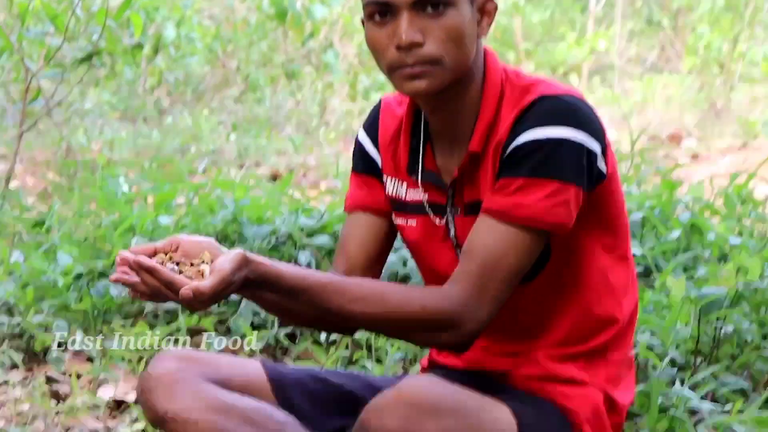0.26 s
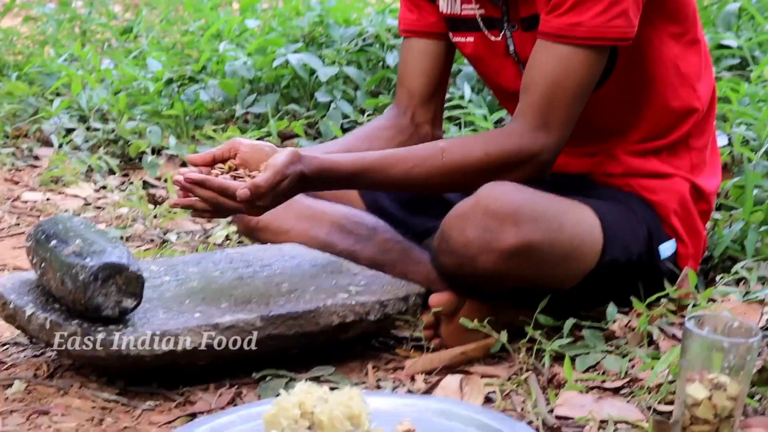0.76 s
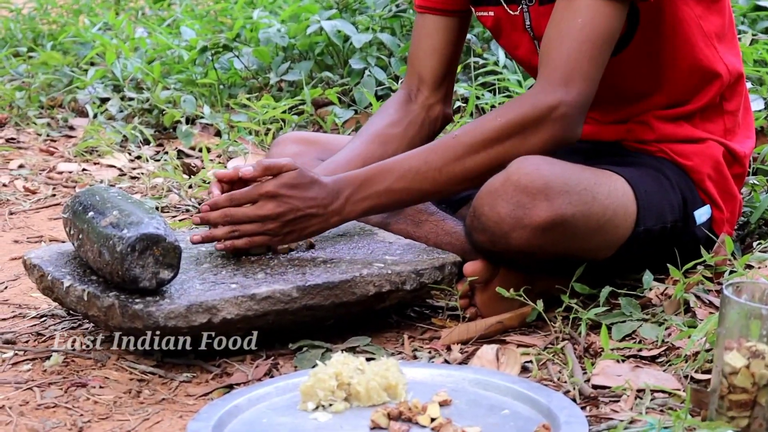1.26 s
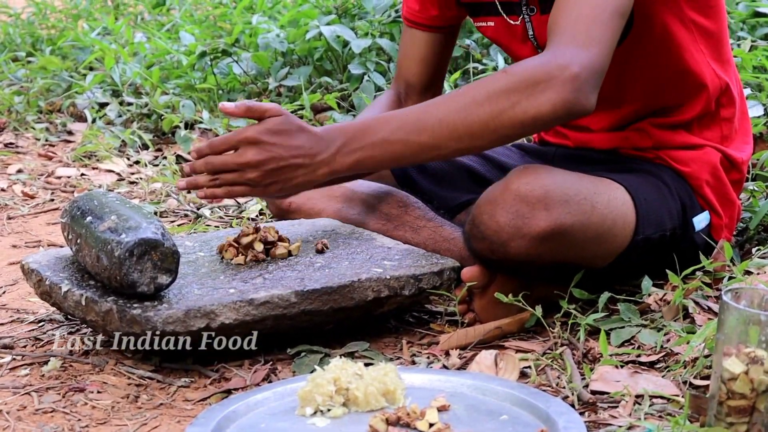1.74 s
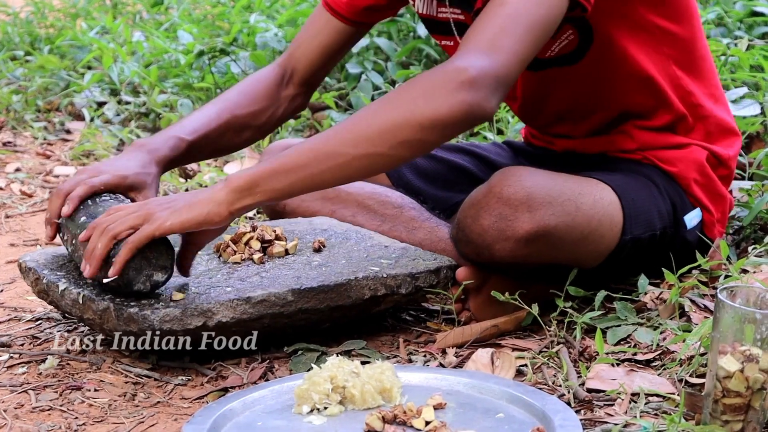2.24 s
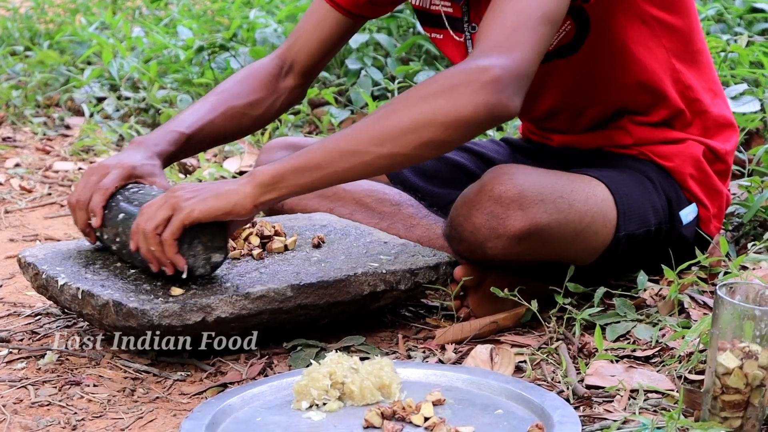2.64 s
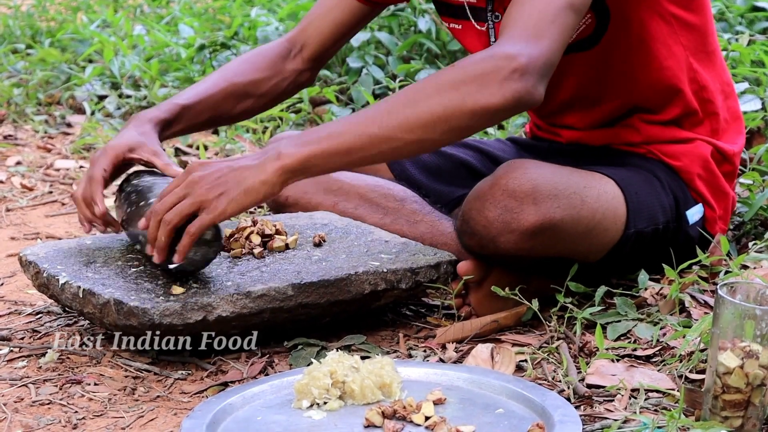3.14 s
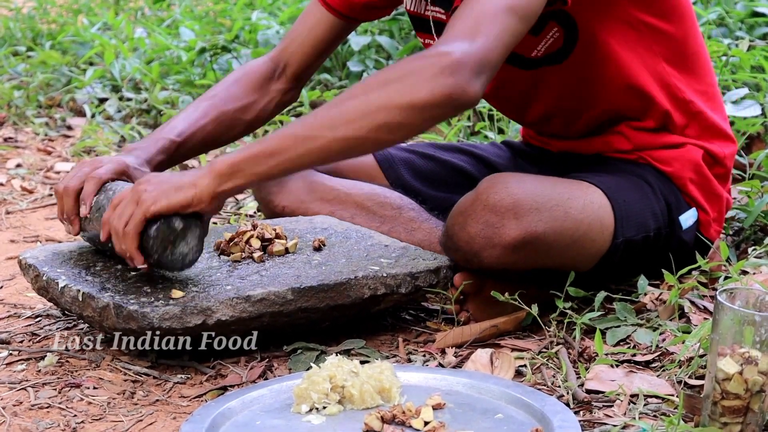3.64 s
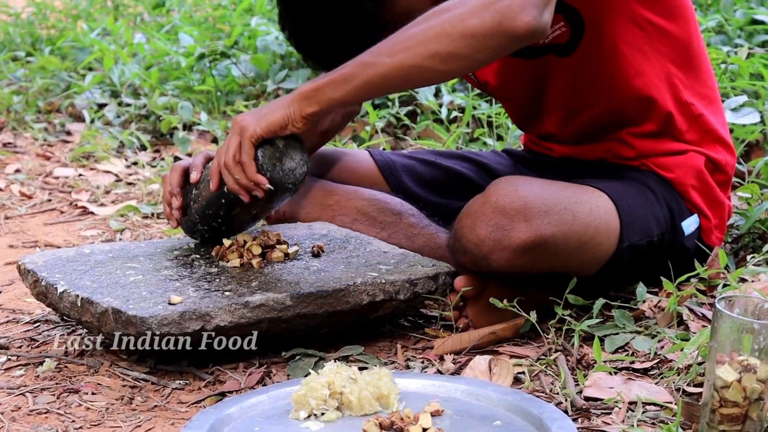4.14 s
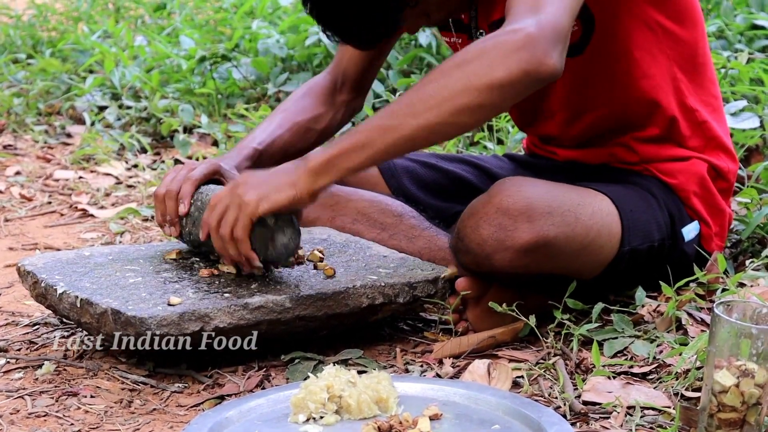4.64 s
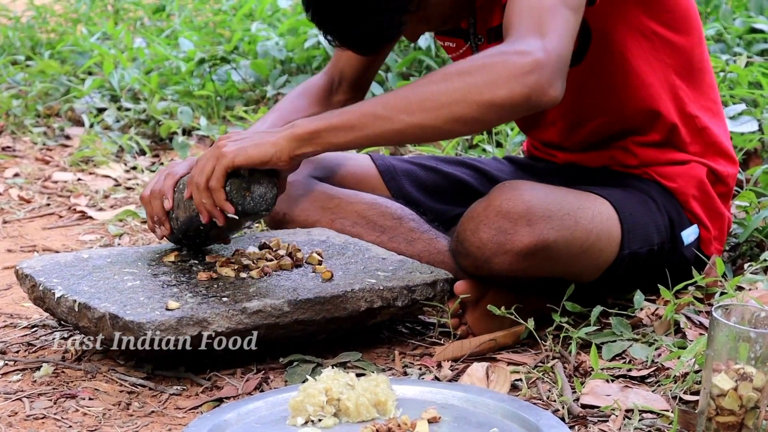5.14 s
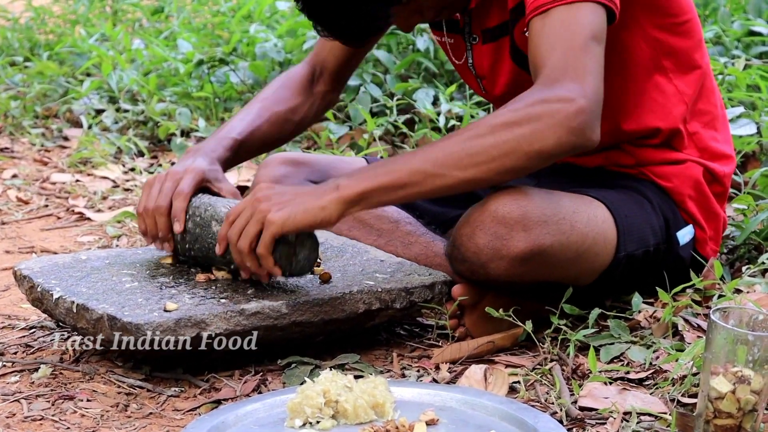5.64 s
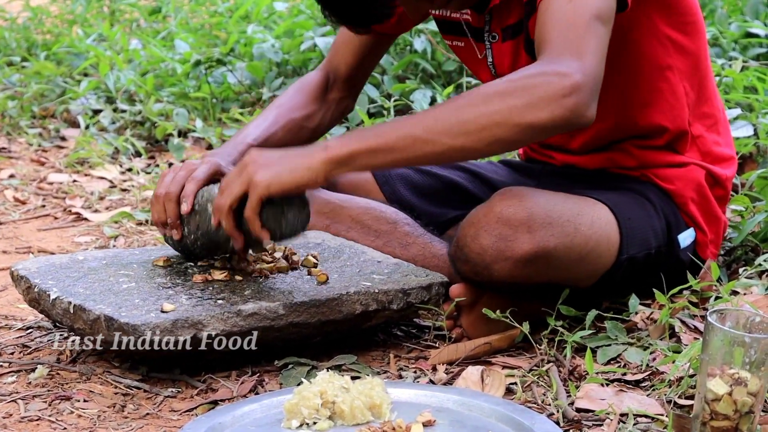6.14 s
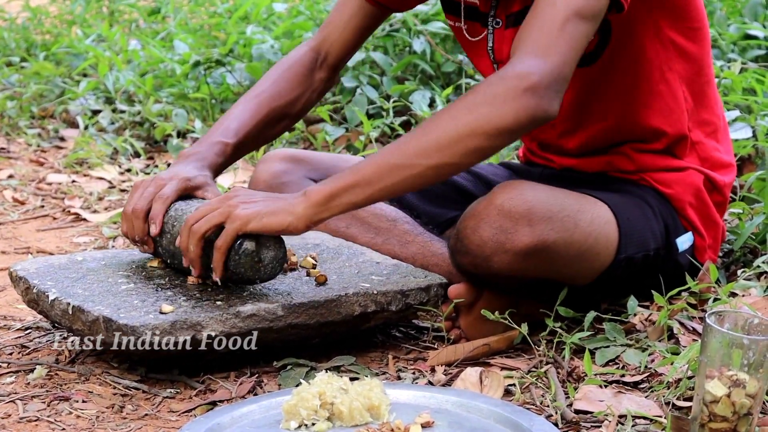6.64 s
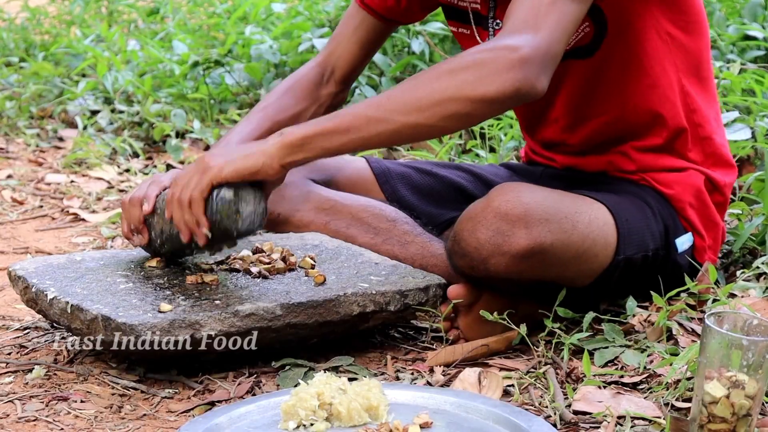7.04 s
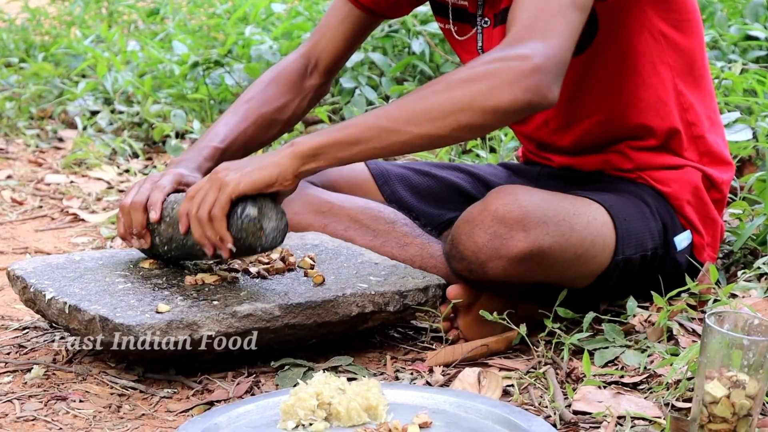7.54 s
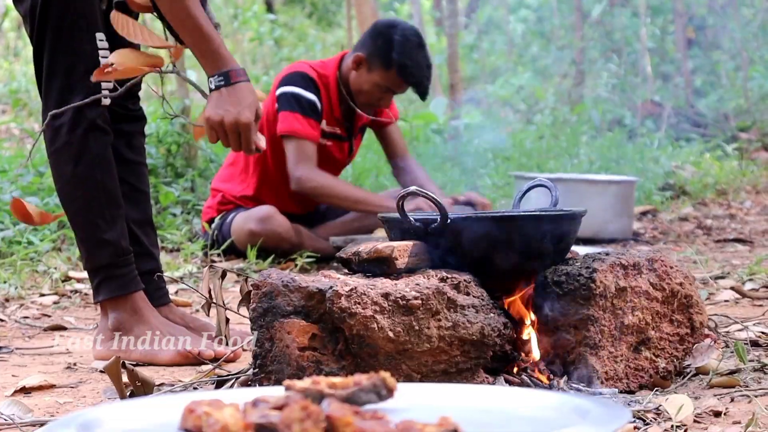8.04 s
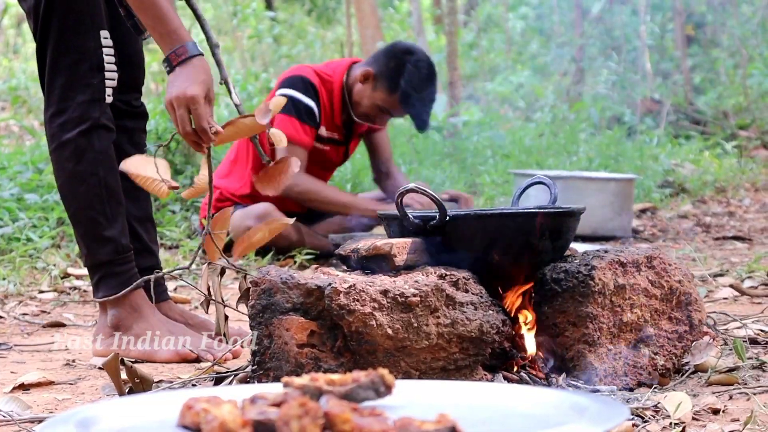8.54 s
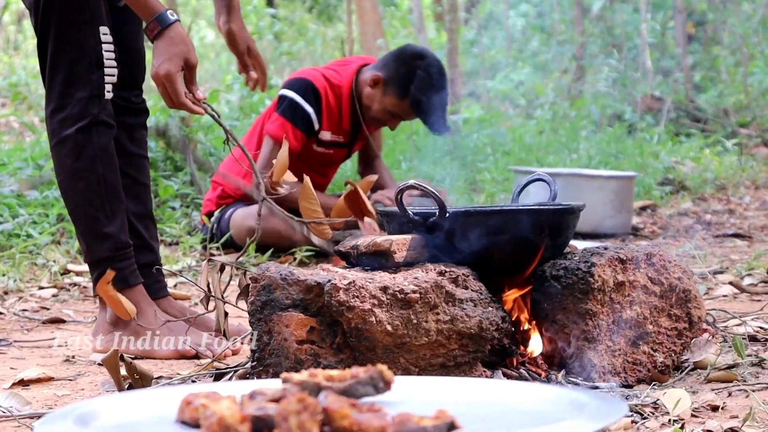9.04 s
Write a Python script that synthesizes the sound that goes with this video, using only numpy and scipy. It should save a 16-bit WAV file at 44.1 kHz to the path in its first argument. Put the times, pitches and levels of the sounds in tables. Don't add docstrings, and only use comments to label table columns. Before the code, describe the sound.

Stone pestle rolls and rumbles over a gritty slab, then pounds dry roots with dull ringing knocks, cicadas droning; after a brief silence, twigs crack.

```python
import sys
import numpy as np
from scipy import signal
from scipy.fft import rfft, irfft, next_fast_len
from scipy.io import wavfile
from scipy.ndimage import uniform_filter1d, map_coordinates

SR = 44100
rng = np.random.default_rng(int(sys.argv[2]) if len(sys.argv) > 2 else 0)


def waveform_to_disk(signal):
    frames = np.transpose(np.atleast_2d(signal))
    scaled = np.clip(frames, -1, 1) * 32767
    samples = np.round(scaled).astype(np.int16)
    wavfile.write(sys.argv[1], SR, samples)


def how_loud(loudness_db):
    steps = np.asarray(loudness_db, float) / 20
    return 10 ** steps


N = 409248

PESTLE_HZ = (2751, 2379)


def unit(x):
    return x / np.sqrt(np.mean(x ** 2) + 1e-20)


def along(points, hz):
    f, v = np.transpose(points)
    return np.interp(np.log(hz + 1), np.log(f + 1), v)


def curve(rows):
    s, value = np.transpose(rows)
    return np.interp(np.arange(N) / SR, s, value)


def wobble(rate):
    knots = rng.standard_normal(int(N * rate / SR) + 4)
    return map_coordinates(knots, [np.arange(N) * rate / SR])


def filtered(x, response):
    m = next_fast_len(N + SR // 2)
    return irfft(rfft(x, m) * response(np.fft.rfftfreq(m, 1 / SR)), m)[..., :N]


def peak(f, hz, width):
    return 1j * f * width / (hz * hz - f * f + 1j * f * width)


def add(track, s, sound, pan_db):
    part = track[:, round(s * SR):round(s * SR) + sound.shape[-1]]
    placed = how_loud([[pan_db / 2], [-pan_db / 2]]) * sound
    part += placed[:, :part.shape[1]]


def grit(rate, spread_db):
    count = int(rate * N / SR)
    size = how_loud(spread_db * rng.exponential(size=count)) * rng.standard_normal(count)
    return unit(np.bincount(rng.integers(N, size=count), size, N))


def blip(t, hz, t60, rise):
    return np.sin(2 * np.pi * hz * t) * how_loud(-60 * t / t60) * (1 - np.exp(-t / rise))


def stroke(s, length, rise, sag_db):
    u = np.arange(N) / SR - s
    start = np.clip(u / rise, 0, 1)
    end = np.clip((length - u) / 0.028, 0, 1)
    return start * end * how_loud(-sag_db * np.clip(u / length, 0, 1))


def scattered(count, db, hz):
    r = rng.standard_normal((count, 3))
    return np.c_[rng.random(count) * N / SR, db + 2.1 * r[:, 0], hz * np.exp(.12 * r[:, 1]), 3 * r[:, 2]]


def contact_pulse(t, hz):
    tones = 2.2 * blip(t, hz, 0.0051, 0.00055) + 1.9 * blip(t, 0.72 * hz, 0.0034, 0.00026)
    return tones + 0.02 * how_loud(-60 * t / .003) * rng.standard_normal(len(t))


def slab_clunk(t, clunk_db):
    # (pitch [Hz], level [dB], 60 dB decay [s])
    tones = [(1008, -4, 0.15), (1194, 3.5, 0.058), (1810, 10, 0.035), (2065, 10.5, .03), (764, 0, 0.046),
             (1290, 6.5, 0.021), (645, -5.5, 0.087)]
    clunk = 0
    for hz, db, t60 in tones:
        level = how_loud(db + clunk_db - 19.5 + rng.normal(0, 3.6))
        clunk = clunk + level * blip(t, hz * rng.normal(1, 0.039), t60, 0.00063)
    return clunk


def pestle_ring(t, grip_s, levels_db, free_db):
    decays = (.42, .32)
    ports = t + [[0], [.00004]]
    grip = 1 / (1 + (t / grip_s) ** 10)
    grip = grip * (1 + .6 * np.exp(-t / .008))
    ring = 0
    for hz, t60, db in zip(PESTLE_HZ, decays, levels_db):
        held = grip * blip(ports, hz, t60, 0.0015)
        free = how_loud(free_db) * blip(ports, hz, .65, 0.0054)
        ring = ring + how_loud(db + 8.5) * (held + free)
    return ring


def echo(x):
    # (pitch [Hz], 60 dB decay [s])
    trees = [(150, 0.18), (1000, 0.4), (2500, 0.26), (5000, 0.13)]
    hz, t, z = signal.stft(rng.standard_normal((2, SR // 2)), SR, nperseg=256)
    tail = signal.istft(z * how_loud(-60 * t / along(trees, hz)[:, None]), SR, nperseg=256)[1]
    tail = 1.2 * tail[0] + [[.55], [-.55]] * tail[1]
    late = np.pad(x, (300, 0))[None]
    return signal.fftconvolve(late, tail / np.linalg.norm(tail[0]), axes=1)


def pounding():
    # (time [s], peak [dB], contact pitch [Hz], high ring [dB], low ring [dB])
    blows = [(4.046, -14.5, 1260, -26, -37), (4.521, -9, 1720, -25, -31), (4.836, -15.5, 1630, -50, -39),
             (5.143, -9.5, 1780, -26.5, -43), (5.454, -17, 1810, -50, -44),
             (5.774, -7.5, 1220, -29.5, -26.5), (5.799, -13.5, 1270, -34, -18), (6.07, -9, 2210, -13, -28),
             (6.939, -19.5, 1420, -46, -31), (7.267, -7, 2270, -22.5, -30),
             (7.555, -17.5, 1230, -26.5, -25.5), (7.853, -7.5, 2000, -16.5, -27),
             (9.185, -18, 1760, -25, -31)]
    # (grip closes [s], crushing [dB], slab tones [dB], free ring [dB])
    aftermath = [(0.067, -6, 2.5, -30), (0.038, -1.5, -4, -28), (.05, 5, 1, -25), (0.042, 0, 2, -21),
                 (.05, 3, 2, -25), (.04, -10, 1, -8), (0.07, 5, 0, -23), (0.054, 2.5, -9, -10.5),
                 (.05, 3.5, 4.5, -25), (0.074, 1, -5, -11.5), (0.06, 5, 0, -12), (0.08, 4.5, -10.5, -20),
                 (0.049, 6, -4, -18)]
    # (time [s], peak [dB], pitch [Hz])
    rebounds = [(4.058, -23, 1200), (4.531, -10, 1300), (4.551, -31, 1900), (4.845, -19, 1300),
                (5.153, -13, 1500), (5.464, -24, 1300), (5.784, -32, 1210), (5.817, -14, 1140),
                (6.097, -21, 1900), (6.113, -16, 1730), (6.138, -27, 1090), (6.949, -21, 1310),
                (7.275, -11, 1490), (7.281, -24, 1910), (7.302, -20, 1309), (7.324, -31, 1100),
                (7.564, -31, 1300), (7.58, -32, 956), (7.863, -17, 1680)]
    # (time [s], peak [dB])
    pings = [
        (7.267, -22),
        (4, -27),
    ]
    scene_change_s = 7.93
    track, t = np.zeros((2, N)), np.arange(SR // 3) / SR
    fibres = unit(filtered(grit(rate=1800, spread_db=1),
                           lambda f: peak(f, 1400, 3000) ** 2 / (1 + (f / 2500) ** 8)))
    for (s, db, hz, high_db, low_db), (grip_s, crush_db, clunk_db, free_db) in zip(blows, aftermath):
        contact = contact_pulse(t, hz)
        clunk = slab_clunk(t, clunk_db)
        start = rng.integers(N - len(t))
        crush = how_loud(-16 + crush_db - 60 * t / 0.24) * (1 - np.exp(-t / 0.026)) * fibres[start:][:len(t)]
        ring = pestle_ring(t, grip_s, (high_db, low_db), free_db)
        thud_level = how_loud(-38 + (0.58 - 1) * db + 27)
        thud = thud_level * (blip(t, 157, 0.036, 0.013) + 1.17 * blip(t, 290, 0.0081, 0.0014))
        knock = how_loud(-33) * blip(t, 1170, 0.013, 0.00097)
        add(track, s, how_loud(db) * (contact + clunk + crush + ring + thud) + knock, -2.5)
        add(track, s, how_loud(db - 8) * echo(contact + .3 * clunk + thud), -1.5)
        if s < scene_change_s < s + 1:
            track[:, round(scene_change_s * SR):] = 0
    for s, db, hz in rebounds:
        bounce = blip(t, hz, 0.0065, 0.00034) + .5 * blip(t, 1.6 * hz, 0.0028, .0004)
        bounce = bounce + 0.31 * blip(t, .6 * hz, 0.0093, .0006)
        add(track, s, how_loud(db + 4.5) * bounce, -2)
    for s, db in pings:
        add(track, s, how_loud(db) * blip(t, 4230, .05, .001), -3)
    return track


def rolling():
    # (start [s], length [s], rumble [dB])
    rolls = [
        (2.595, 0.23, -33),
        (2.797, 0.21, -40.5),
        (3.765, 0.14, -44),
        (8.049, 0.16, -44.5),
        (8.318, 0.098, -39.5),
        (8.607, 0.15, -46.5),
        (8.703, 0.11, -47),
    ]
    # (start [s], length [s], level [dB], ring [0 high, 1 low])
    songs = [(2.625, 0.063, -43, 1), (2.678, .055, -44, 1), (2.745, 0.054, -49, 1), (2.795, 0.039, -50, 1),
             (2.611, 0.14, -52, 0), (2.388, .04, -54, 0), (2.828, 0.084, -53, 0), (3.78, 0.16, -47.5, 1),
             (8.078, 0.09, -50, 0), (8.178, .035, -49, 1), (8.388, 0.099, -52, 1), (8.62, 0.045, -49, 0),
             (8.725, 0.062, -49.5, 1), (8.81, .03, -51, 0)]
    # (pitch [Hz], width [Hz], level [dB])
    resonances = [(270, 51, -3), (586, 125, 1), (1190, 67, -8), (1725, 9.7, -37)]

    def slab(f):
        total = 0.12 * peak(f, 433, 1000)
        for k, (hz, width, db) in enumerate(resonances):
            total = total + (-1) ** k * how_loud(db) * peak(f, hz, width)
        return total

    rumble = unit(filtered(grit(rate=900, spread_db=2.5), slab))
    rings = []
    for hz in PESTLE_HZ:
        tone = np.sqrt(2) * np.sin(2 * np.pi * hz * np.arange(N) / SR + 0.97 * wobble(40))
        rings.append(tone * how_loud(4.5 * wobble(45)))
    sound = np.zeros(N)
    for s, length, db in rolls:
        sound += stroke(s, length, rise=0.068, sag_db=10) * how_loud(db + 2.5) * rumble
    for s, length, db, ring in songs:
        sound += stroke(s, length, rise=0.0088, sag_db=3) * how_loud(db) * rings[round(ring)]
    return sound * how_loud([[-.4], [.4]])


def bump(t, hz):
    puff = uniform_filter1d(uniform_filter1d(rng.standard_normal(len(t)), size=14), size=14)
    tones = blip(t, hz, 0.034, 0.0017) + 0.71 * blip(t, 1.83 * hz, 0.012, 0.0007)
    tones = tones + 0.39 * blip(t, 0.47 * hz, 0.028, 0.00029)
    click = 0.35 * blip(t, 2.4 * hz, 0.0028, 0.0007)
    return tones + click + 1.24 * puff * how_loud(-60 * t / 0.09)


def bumps():
    # (time [s], peak [dB], pitch [Hz])
    handling = [(.748, -34, 250), (1.326, -41, 332), (2.108, -39, 200), (2.396, -27.5, 626),
                (2.988, -32, 223), (3.209, -32.5, 273), (3.246, -32.5, 570), (3.318, -29.5, 582),
                (3.694, -34, 560), (3.781, -30.5, 747), (3.867, -30, 553)]
    # (time [s], peak [dB], pitch [Hz])
    jolts = [(2.588, -37, 560), (2.612, -44, 500), (2.632, -29.5, 600), (2.642, -21, 590),
             (2.675, -14.5, 643), (2.682, -23.5, 573), (2.695, -19.5, 600), (2.7, -15, 570),
             (2.711, -26, 595), (2.732, -18, 620), (2.75, -15, 570), (2.78, -35, 520), (2.788, -18, 577),
             (2.806, -32.5, 560), (2.822, -23, 570), (2.843, -26.5, 570), (2.878, -40.5, 568),
             (2.908, -29, 603), (2.939, -29.5, 587), (2.975, -42, 519)]
    # (time [s], peak [dB], pitch [Hz])
    rocking = [(4.044, -25, 671), (4.415, -35, 360), (5.048, -34.5, 332), (5.339, -32.5, 332),
               (5.361, -33, 930), (5.666, -40, 567), (5.384, -31.5, 150), (5.948, -35.5, 570),
               (6.015, -39.5, 150), (6.071, -25, 243), (7.06, -38.5, 790), (4.278, -49, 1010),
               (4.297, -42, 1140), (7.707, -44, 880), (6.226, -38.5, 544), (6.302, -34, 513),
               (6.622, -39.5, 378), (6.645, -35.5, 954), (7.176, -37, 520), (7.216, -27.5, 573),
               (7.505, -31, 800), (7.525, -29, 156), (7.805, -43, 573), (7.825, -37, 170), (5.97, -39, 200),
               (6.03, -41, 170), (4.545, -29, 169), (4.85, -32, 170)]
    track, t = np.zeros((2, N)), np.arange(SR // 16) / SR
    for rows, gain_db, pan_db in ((handling, 6, 1.1), (jolts, -2.5, .9), (rocking, 6, -.2)):
        for s, db, hz in rows:
            add(track, s, how_loud(db + gain_db) * bump(t, hz), pan_db)
    for s, db, hz, pan_db in scattered(count=18, db=-41, hz=394):
        add(track, s, how_loud(db + 4.5) * bump(t, hz), pan_db)
    knee = blip(t, 340, 0.016, 0.00044) + 0.42 * blip(t, 1020, 0.012, 0.0004)
    add(track, .734, how_loud(-12.5) * knee, 1.1)
    return track


def distant_pounding():
    # (time [s], peak [dB], pitch [Hz])
    far_blows = [(8.083, -32.5, 510), (8.183, -32, 325), (8.305, -29, 754), (8.369, -31.5, 490),
                 (8.45, -34.5, 354), (8.604, -44, 486), (8.643, -34, 510), (8.676, -34.5, 1090),
                 (8.766, -37, 740), (8.843, -34.5, 328), (8.893, -31.5, 325), (8.994, -36.5, 490),
                 (9.126, -32.5, 303), (9.153, -42, 543), (9.188, -32.5, 493)]
    # (time [s], peak [dB])
    booms = [
        (8.068, -33),
        (8.084, -35),
        (8.36, -36),
        (8.39, -32),
        (8.603, -29.5),
        (8.642, -29),
        (9.02, -39),
        (9.127, -33),
        (9.152, -35),
        (9.188, -21.5),
    ]
    track, t = np.zeros((2, N)), np.arange(SR // 16) / SR
    for s, db, hz in far_blows:
        add(track, s, how_loud(db + 6) * bump(t, hz), .6)
        add(track, s, how_loud(db - 3) * blip(t, 150 * rng.normal(1, 0.17), 0.18, 0.0067), 0)
    for s, db in booms:
        boom = blip(t, 490, 0.088, 0.0039) * np.cos(np.pi / 2 * t / t[-1])
        add(track, s, how_loud(db) * boom, 0)
    return track


def ticks():
    # (time [s], peak [dB], pitch [Hz], pan [dB])
    chips = [
        (5.7733, -7.5, 2700, -4),
        (6.0696, -0.5, 2930, -5.5),
        (7.2669, -16, 3090, -8),
    ]
    # (time [s], peak [dB], pitch [Hz], pan [dB])
    near_ticks = [(0.412, -31, 4150, -15), (.7337, -28, 3500, -2), (0.486, -29, 2570, -6),
                  (0.8385, -32.5, 3330, -15), (0.8587, -25, 3750, 3), (1.8148, -32, 3980, 11),
                  (3.3248, -31.5, 3920, 11), (3.5175, -30, 3340, -12), (3.7179, -32, 3700, 10),
                  (3.874, -30, 3600, 4), (4.4014, -32, 3820, 5), (4.521, -28, 4450, -1.5),
                  (4.606, -29, 3770, 6), (4.8663, -27, 3680, -2), (4.9336, -27, 3900, 3),
                  (5.375, -29.5, 3420, -7), (7.2265, -26.5, 3530, -2.5), (7.5153, -31.5, 3500, -13),
                  (7.552, -35.5, 2980, -34), (7.8065, -29, 3440, -5), (8.2018, -34, 2920, -3.5),
                  (8.2906, -25, 3440, -7), (8.3384, -30, 2980, -2.5), (8.3729, -26, 3470, -3),
                  (8.4476, -18.5, 2780, -5), (8.539, -28, 3230, -5), (8.8, -25, 3000, -3.5),
                  (8.524, -30, 2620, -3), (8.717, -33, 2750, -5), (8.733, -35, 2750, -5),
                  (8.962, -27, 2750, -3), (9.167, -28, 2750, -2), (8.786, -31, 4000, 0),
                  (8.929, -33, 3700, -2), (9.011, -35, 2800, -2), (.455, -34, 3000, -9),
                  (1.05, -44, 2900, 3), (6.228, -28, 3770, 0), (7.394, -29, 3960, 2),
                  (9.0364, -35, 3260, 0), (9.0825, -28, 4030, -6), (9.241, -24, 3400, -9)]
    # (time [s], peak [dB], pitch [Hz])
    cracks = [(8.069, -25, 1340), (8.099, -23, 1460), (8.153, -33, 1990), (8.181, -23, 1130),
              (8.234, -17, 2420), (8.281, -30, 2000), (8.34, -21, 2360), (8.374, -17.5, 2200),
              (8.446, -30, 1800), (8.083, -28, 1300), (8.212, -25, 2100), (8.219, -34, 1200),
              (8.252, -31, 2400), (8.311, -22, 1920), (8.316, -27, 2900), (8.386, -25, 900),
              (8.467, -30, 1400), (8.682, -35, 1700), (8.851, -31, 1000), (8.915, -27, 1090),
              (8.9, -27, 2400), (9.217, -22, 1490), (9.254, -23, 1800), (9.272, -29, 1300),
              (8.652, -27, 1260), (8.901, -28, 870), (9.127, -26, 2260), (9.166, -37, 1713),
              (9.24, -13, 2400)]
    track, t = np.zeros((2, N)), np.arange(SR // 16) / SR
    cracking = [(s, db - 6.5, hz, -3.5) for s, db, hz in cracks]
    faint = scattered(count=55, db=-32.5, hz=3700)
    for s, db, hz, pan_db in [*chips, *near_ticks, *cracking, *faint]:
        tick = blip(t, hz, 0.0094, 0.0011) + 0.29 * blip(t, 0.81 * hz, 0.0082, 0.0001)
        add(track, s, how_loud(db + 7) * tick, pan_db)
    return track


def leaf_snaps():
    # (time [s], peak [dB], body [dB], pan [dB])
    snaps = [(0.412, -31.5, 0, -7), (0.7362, -22, -14.5, 20), (.838, -36, -1.5, -11), (1.013, -29, -13, -6),
             (1.211, -22, -14.5, 7.5), (1.295, -32, -9, 7), (2.0635, -38.5, -3, -1), (3.3667, -44, -5, -6),
             (3.4311, -37, -8, 10), (3.5184, -32.5, -0.5, -11), (5.1672, -41.5, -1.5, 8),
             (5.381, -43.5, 5.5, -9), (5.7723, -51, -7, 1.5), (6.0696, -34, -7, 20),
             (6.9366, -23, -14.5, 12), (7.228, -35.5, -1.5, -10.5), (7.264, -26.5, -8.5, 8),
             (7.516, -18.5, -15, 11), (7.8064, -28.5, -3.5, 7), (8.1708, -38, -7, -4.5),
             (8.212, -14.5, -16.5, -10.5), (8.905, -33.5, -8, -5), (9.0695, -31.5, -8.5, -10),
             (9.2389, -29.5, -13, -6)]
    track, t = np.zeros((2, N)), np.arange(SR // 16) / SR
    for s, db, body_db, pan_db in snaps:
        puff = rng.standard_normal((3, len(t))) * (how_loud(-60 * t / 0.017) + 0.25 * how_loud(-60 * t / 0.16))
        bright = np.diff(puff[:2], n=2, prepend=np.zeros((2, 2))) / 2.5
        add(track, s, how_loud(db - 37) * (bright + how_loud(body_db + 37) * puff[2]), pan_db)
    return track


def twigs():
    # (start [s], length [s], rustle [dB], brightness [dB])
    pulls = [
        (8.042, 0.15, -43.5, -28.5),
        (8.146, 0.11, -39, 6.5),
        (8.238, 0.1, -37, 11),
        (8.26, 0.25, -44, -3),
        (8.606, 0.51, -55.5, -24),
        (9.42, 0.55, -37, -12),
        (8.168, 0.091, -39, 7),
        (8.02, 1.4, -64, 12),
        (9.2, .1, -40.5, 6),
    ]
    dull = filtered(np.array([grit(rate=7600, spread_db=1.4) for _ in "LR"]),
                    lambda f: peak(f, 1280, 3100) ** 2)
    bright = filtered(np.array([grit(rate=2700, spread_db=4.5) for _ in "LR"]),
                      lambda f: peak(f, 11400, 8100) ** 2)
    dull = unit(1.8 * dull[0] + [[.4], [-.4]] * dull[1]) * how_loud([[-1.2], [1.2]])
    bright = unit(bright) * how_loud([[-1], [1]])
    lumps_db = 4.2 * wobble(45)
    track = np.zeros((2, N))
    for s, length, db, bright_db in pulls:
        rustle = how_loud(db + 5.5 + lumps_db) * dull + how_loud(db + bright_db - 5) * bright
        track += stroke(s, length, rise=0.096, sag_db=11.5) * rustle
    return track


def rush(spectrum, patchy_db, lag):
    # (pitch [Hz], likeness [0 to 1])
    alike = [(60, 1), (300, 0.91), (1000, 0.68), (3000, 0.63), (5000, 0.12), (12000, .1)]
    z = signal.stft(rng.standard_normal((2, N)), nperseg=512)[2]
    patches = uniform_filter1d(rng.standard_normal(z.shape[1:]), size=6, axis=0)
    patches = uniform_filter1d(patches, size=10, axis=1)
    pair = signal.istft(z * how_loud(patchy_db * unit(patches)), nperseg=512)[1][:, :N]

    def middle_and_side(hz):
        turn = np.arccos(np.clip(along(alike, hz), -1, 1)) / 2
        return how_loud(along(spectrum, hz)) * [np.cos(turn), np.sin(turn)]

    mid, side = filtered(pair, middle_and_side)
    stereo = np.array([mid + side, mid - side])
    return unit(filtered(stereo, lambda hz: np.exp(np.pi * 1j * lag * np.outer([-1, 1], hz))))


def woods():
    # (time [s], level [dB])
    loudness = [(0, -42.5), (.5, -37), (1.9, -36.5), (3, -36), (4.3, -36.5), (5.7, -36), (6.05, -37.5),
                (6.4, -37), (7.05, -37), (7.55, -36.5), (7.84, -38.5), (8.06, -39), (8.22, -36.5),
                (9.28, -38)]
    # (pitch [Hz], level [dB per Hz])
    chorus_bands = [(2410, -27), (4100, -24.5), (4310, -19), (4860, -2.5), (5110, -3.5), (5690, -10.5),
                    (6090, -10), (6810, -25), (7250, -20), (7760, -27.5), (9240, -22.5), (11800, -39.5),
                    (14600, -37), (15500, -40.5), (15800, -56)]
    # (pitch [Hz], level [dB per Hz])
    air_bands = [(15, -49), (25, -17), (92, 0.5), (183, -5.5), (328, -7.5), (374, -11.5), (614, -12),
                 (746, -13), (1060, -22.5), (3250, -6.5), (4400, -10), (5720, -37), (9680, -120)]
    chorus_db = curve(loudness)
    hush_db = -44.5 + 0.57 * (chorus_db - np.median(chorus_db))
    chorus = how_loud(chorus_db + 3 + 0.31 * wobble(7)) * rush(chorus_bands, patchy_db=0.9, lag=-0.00017)
    hush = how_loud(hush_db + .7 * wobble(7.3)) * rush(air_bands, patchy_db=1.2, lag=-0.00014)
    return chorus + hush


def scene():
    near = pounding() + rolling() + bumps() + distant_pounding() + ticks() + leaf_snaps()
    near = filtered(near, lambda f: (1j * f / (48 + 1j * f)) ** 2)
    return near + twigs() + woods()


def low_pass(x):
    return signal.sosfilt(signal.butter(12, 16450, fs=SR, output="sos"), x)


def record(dry):
    # (time [s], gain [0 to 1])
    fade = [
        (0, 1),
        (7.855, 1),
        (7.894, 0),
        (7.968, 0),
        (7.975, .07),
        (7.995, .2),
        (8.045, 1),
    ]
    held = dry / (1 + np.abs(dry / .97) ** 6) ** (1 / 6)
    heard = filtered(held, lambda f: (1j * f / (45 + 1j * f)) ** 2 * (f < 15600))
    return low_pass(heard * curve(fade))


dry = scene()
out = record(dry)
waveform_to_disk(out)
```